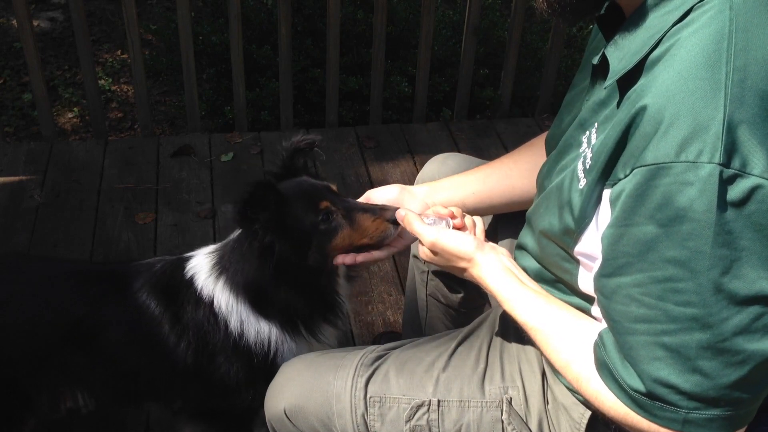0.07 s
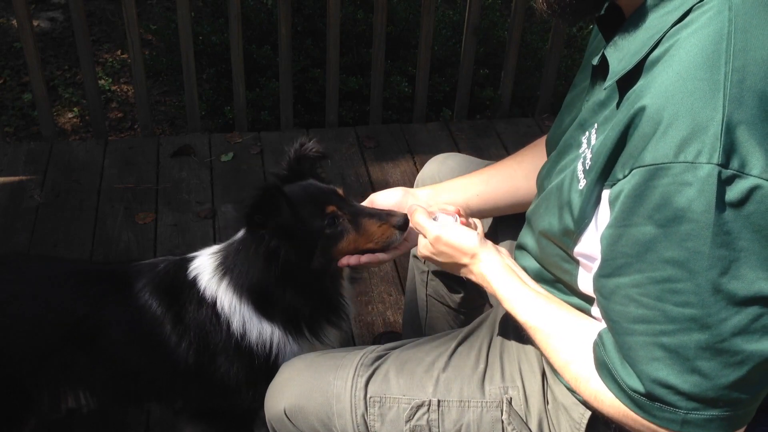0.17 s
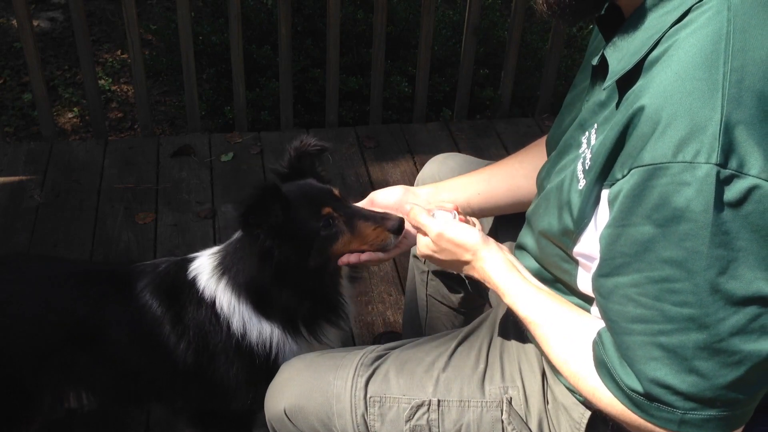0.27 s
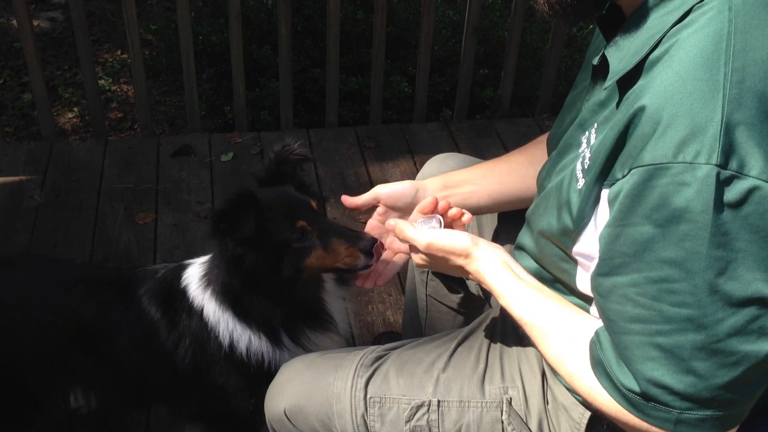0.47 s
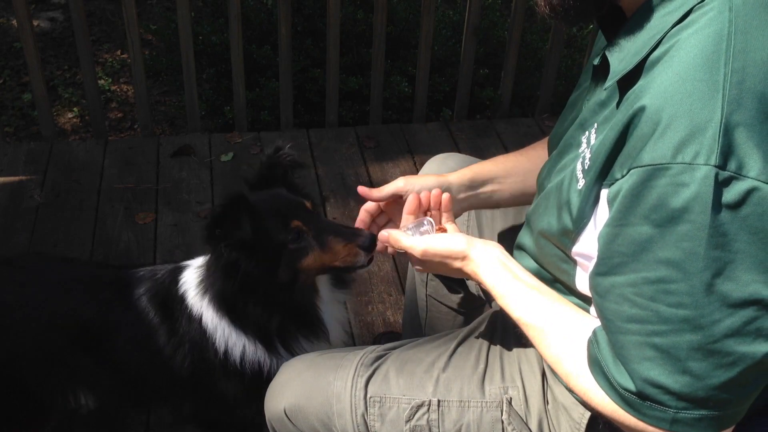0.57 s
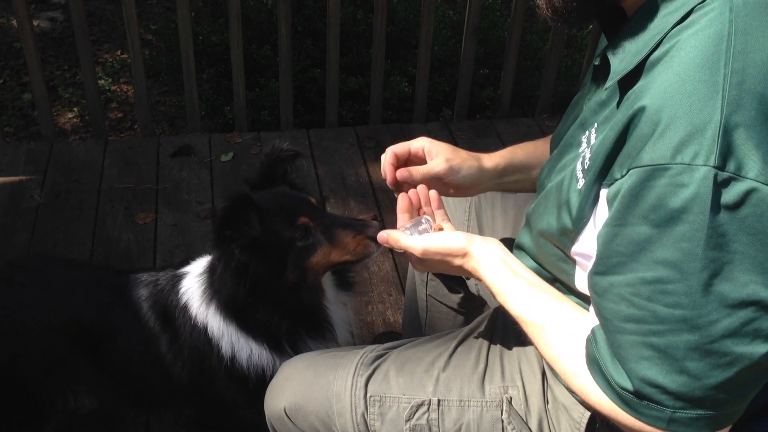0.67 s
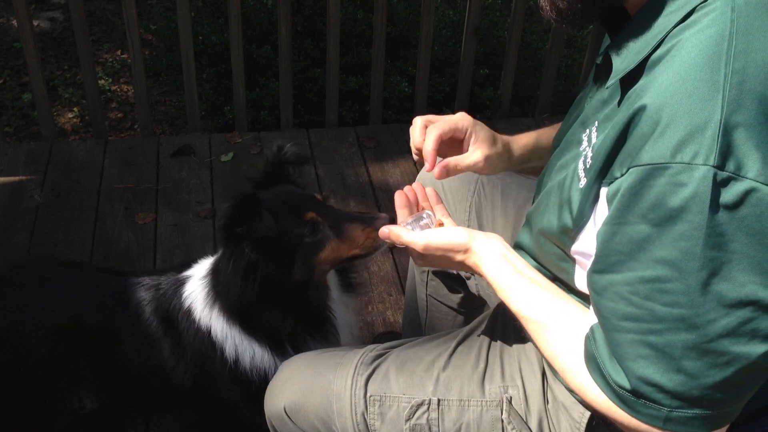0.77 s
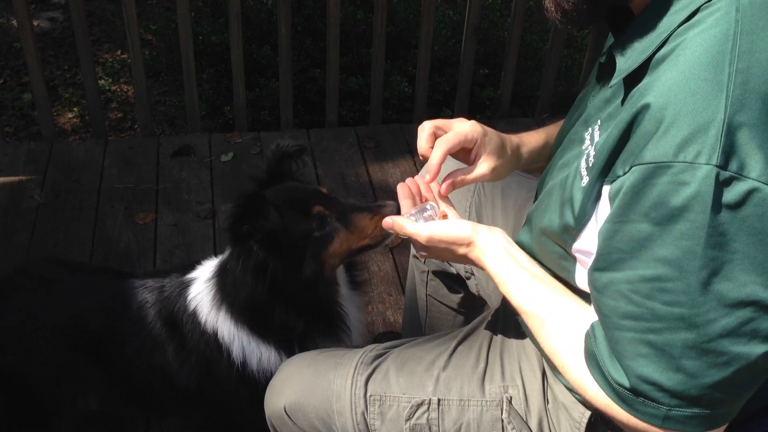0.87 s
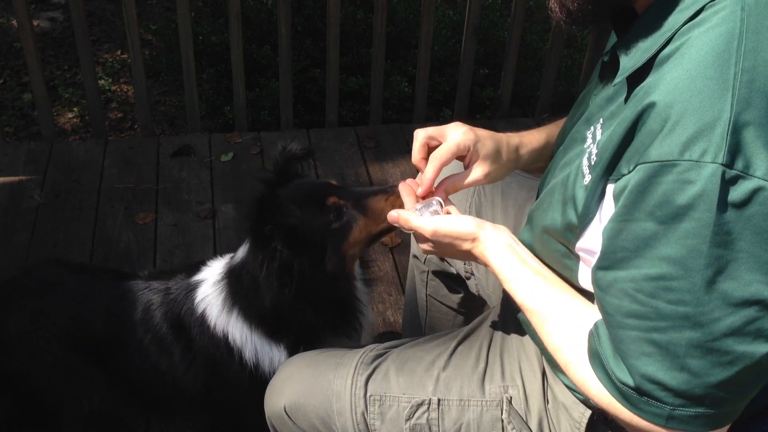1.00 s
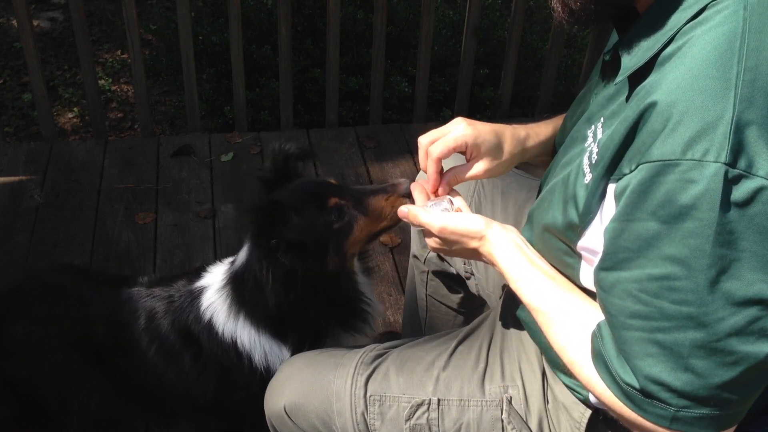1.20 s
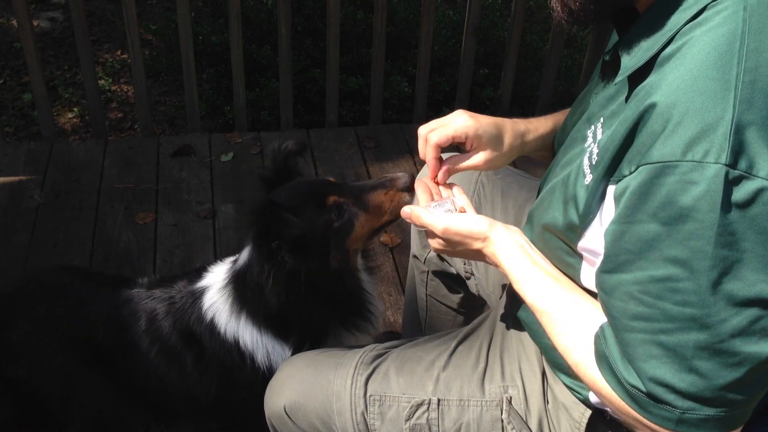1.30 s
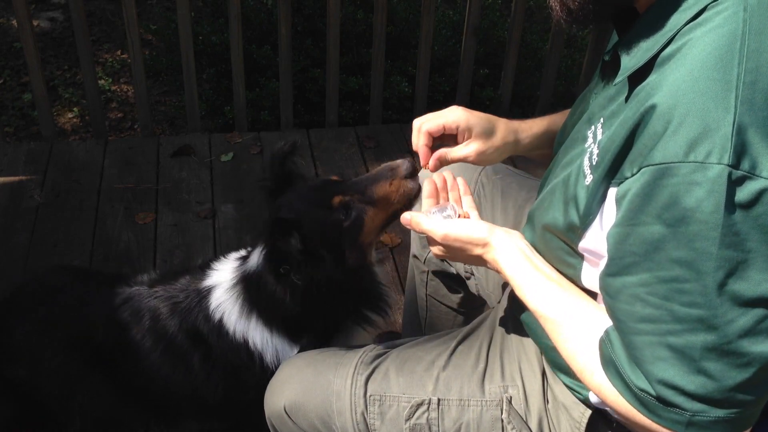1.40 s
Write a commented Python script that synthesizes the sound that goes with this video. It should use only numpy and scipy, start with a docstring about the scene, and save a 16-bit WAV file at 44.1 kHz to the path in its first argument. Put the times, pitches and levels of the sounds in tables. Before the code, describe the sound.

Two quick, crisp clicks come from a small clicker nearby, each with a very brief metallic ring. Then hands move with a soft, dull knock, while birds whistle faintly far from the quiet wooden deck over light hiss.

```python
"""A quiet wooden deck outdoors, where a handheld training clicker is pressed and let go.
Its steel tongue buckles, then springs back, each time with a snap and a brief ring;
hands, boards and railing throw the snap back. A soft knock and thuds follow as the hands move.
Birds whistle far off among the trees, over a faint hiss of air."""
import sys
import numpy as np
from scipy import signal
from scipy.fft import rfft, irfft
from scipy.io import wavfile
from scipy.ndimage import uniform_filter1d

SR = 44100
rng = np.random.default_rng(int(sys.argv[2]) if len(sys.argv) > 2 else 0)


def file_out(sig):
    """Save sig as 16-bit WAV at sys.argv[1]."""
    # one column per channel
    cols = np.atleast_2d(sig).T
    # limit, then scale
    lim = np.clip(cols, -1, 1)
    pcm = np.round(lim * 32767).astype(np.int16)
    wavfile.write(sys.argv[1], SR, pcm)


N = 63945


def clicker(press_s=0.22415, release_s=0.39845, ring_rise_s=0.0006):
    """The steel tongue snaps over with a millisecond crack and rings in its new shape."""
    # Colour of each snap in the plastic case. Each row: frequency in Hz, level in dB.
    press_snap = [(300, -32.5), (950, -25.5), (1350, -15.5), (2350, -17), (3000, 0.5), (4500, 0), (5200, 3),
                  (5950, 3), (6450, 14.5), (7100, 20), (7700, 16.5), (8150, -4), (10100, -9), (11650, 3),
                  (13100, -16), (14500, -19), (16000, -39.5)]
    release_snap = [(300, -35), (950, -23), (1400, -17.5), (2300, -19), (2950, 4.5), (3700, 4), (4100, -4),
                    (4400, 0.5), (5000, 11.5), (5550, 2), (6700, 8.5), (7700, 4.5), (8400, -13.5),
                    (9400, -1.5), (11300, -15), (12500, -6), (13300, -18), (14250, -1), (15400, -35)]
    # The tongue's ring, bent and relaxed. Each row: frequency in Hz, level in dB, T60 in seconds.
    bent_modes = [(2030, -50.5, 0.038), (3300, -45, .035), (3990, -36.5, .032), (4500, -40.5, .025),
                  (6740, -31, .026), (10580, -49.5, .022), (11030, -38.5, .028), (11320, -32, 0.031),
                  (11690, -33, .03), (11970, -36.5, 0.031), (12170, -40, 0.037)]
    relaxed_modes = [(2060, -50.5, 0.046), (3200, -54, 0.029), (3700, -48, 0.022), (4300, -29, 0.035),
                     (4530, -27.5, 0.025), (4705, -42, 0.041), (4980, -37, 0.04), (5500, -38, .022),
                     (6370, -39, .028), (10180, -43, 0.026), (12650, -36, .03), (13800, -48, .03)]
    clicks = [(press_s, press_snap, bent_modes), (release_s, release_snap, relaxed_modes)]
    out = np.zeros(N)
    for start, snap, modes in clicks:
        crack = impulse(snap)
        t = np.arange(len(crack)) / SR
        attack = 1 - np.exp(-(t / ring_rise_s) ** 2)
        add(out, start, crack + attack * ring(modes))
    return out


def deck(dry, scatter_db=-14.5, onset_s=0.0028, hold_s=0.023, drop_db=-5.5, yard_db=-34.5, yard_t60=0.4):
    """Adds close echoes, scatter that thins out beyond the railing, and a faint tail from the yard."""
    # Early reflections off hands, lap and boards. Each row: delay in seconds, level in dB.
    near_echoes = [(.0006, -14.5), (.0017, -20.5), (.0040, -20), (.0076, -27.5)]
    # Tone of the scatter off deck and railing. Each row: frequency in Hz, relative level in dB.
    scatter_colour = [(300, 4.5), (2000, 7), (3500, 1.5), (5000, 1), (6800, -2.5), (7600, -7), (9000, 3),
                      (11500, 4), (15000, -8)]
    # Its decay. Each row: frequency in Hz, T60 in seconds.
    scatter_t60 = [(300, 0.6), (2000, 0.34), (5000, 0.25), (7200, 0.16), (11500, 0.15), (14000, 0.6)]
    size = 24000
    t = np.arange(size) / SR
    # Each band of noise holds briefly, then dies at its own rate.
    hz, frame_s, bands = signal.stft(rng.standard_normal(size), SR, nperseg=256)
    decay_db = 60 * np.maximum(frame_s - hold_s, 0) / curve_at(scatter_t60, hz)[:, None]
    bands *= amp(curve_at(scatter_colour, hz)[:, None] - decay_db)
    scatter = signal.istft(bands, SR, nperseg=256)[1][:size]
    scatter *= np.minimum(t / onset_s, 1) * amp(drop_db * (t > hold_s))
    response = amp(scatter_db) * scatter / np.linalg.norm(scatter)
    response += amp(yard_db) * reverb_tail(yard_t60, size)
    for delay, db in near_echoes:
        add(response, delay, amp([db]))
    return dry + signal.fftconvolve(dry, response)[:N]


def handling(knock_s=0.5416, knock_db=-40):
    """Moving hands make a dull knock, two low thuds and a little rustle."""
    # Body of the knock. Each row: frequency in Hz, relative level in dB, T60 in seconds.
    knock_modes = [(239, -11.5, .045), (400, -7.5, 0.029), (630, -2.5, .018), (836, -6, 0.019),
                   (1140, -20, .012), (3000, -22, .004)]
    # Thuds just after it. Each row: start in seconds, length in seconds, pitch in Hz, level in dB.
    thuds = [(.551, 0.024, 94, -48.5), (0.575, 0.02, 72, -49.5)]
    # Rustles of the hands. Each row: start in seconds, length in seconds, level in dB.
    rustles = [(0.521, 0.06, -62.5), (.59, 0.17, -65.5)]
    # Their dull tone. Each row: frequency in Hz, relative level in dB.
    rustle_colour = [(30, -8), (70, 4.5), (150, 4), (700, 0), (1600, -5.5), (3500, -8.5), (12000, -27)]
    out = np.zeros(N)
    add(out, knock_s, amp(knock_db) * ring(knock_modes))
    for start, length, hz, db in thuds:
        t, swell = arch(length)
        add(out, start, -amp(db) * swell * np.sin(2 * np.pi * hz * t))
    for start, length, db in rustles:
        t, swell = arch(length)
        add(out, start, amp(db) * swell * noise(rustle_colour)[:len(t)])
    return out


def birds(bend_depth=0.0302, waver_depth=0.02006, wet_db=-4, woods_t60=0.65):
    """Distant whistles that glide, bend up mid-note and waver, smeared by the trees."""
    # Each row: start in seconds, length in seconds, first and last pitch in Hz, level in dB.
    notes = [(.005, .045, 2550, 2760, -67), (.043, 0.026, 2764, 2824, -53), (0.077, 0.044, 2900, 2900, -66),
             (0.149, 0.033, 2840, 3160, -66), (0.302, 0.03, 2248, 2415, -60.5),
             (.365, 0.04, 2435, 2430, -64), (0.469, 0.024, 2695, 2876, -58.5),
             (.49, .045, 2960, 2967, -65.5), (0.551, 0.029, 2930, 2980, -68),
             (.605, 0.031, 2860, 3090, -68), (.757, 0.037, 2156, 2130, -61.5),
             (.828, .026, 2315, 2387, -60.5), (.875, .03, 2370, 2375, -70)]
    whistles = np.zeros(N)
    for start, length, first_hz, last_hz, db in notes:
        t, swell = arch(length)
        waver = unit_rms(uniform_filter1d(rng.standard_normal(N), size=200))[:len(t)]
        glide_hz = first_hz + (last_hz - first_hz) * t / length
        hz = glide_hz * (1 + bend_depth * swell + waver_depth * waver)
        add(whistles, start, amp(db) * swell * np.sin(2 * np.pi * np.cumsum(hz) / SR))
    woods = signal.fftconvolve(whistles, reverb_tail(woods_t60, N))[:N]
    return whistles + amp(wet_db) * woods


def air(end_db=-63, fade_db_per_s=-0.14):
    """A faint bed of outdoor wash and hiss, easing very slowly."""
    # Tone of the bed. Each row: frequency in Hz, relative spectral density in dB.
    air_colour = [(15, -52.5), (25, -29.5), (45, -12), (80, -4.5), (115, -8.5), (180, -5), (400, -4),
                  (700, -8.5), (1150, -14), (2500, -13.5), (4400, -13.5), (14800, -18), (16000, -25.5)]
    from_end_s = (np.arange(N) - N) / SR
    return noise(air_colour) * amp(end_db + fade_db_per_s * from_end_s)


def amp(db):
    """Decibels to gain."""
    return 10 ** (np.asarray(db) / 20)


def unit_rms(x):
    """Scales to an RMS of one."""
    return x / np.sqrt(np.mean(x ** 2) + 1e-20)


def curve_at(points, hz):
    """Interpolates a curve on a log-frequency axis."""
    point_hz, values = np.transpose(points)
    return np.interp(np.log(hz + 1), np.log(point_hz + 1), values)


def add(mix, start_s, sound):
    """Mixes a sound in at its start time."""
    part = mix[max(round(start_s * SR), 0):][:len(sound)]
    part += sound[:len(part)]


def noise(colour):
    """Steady noise of the given colour, at an RMS of one."""
    gain = amp(curve_at(colour, np.fft.rfftfreq(N, 1 / SR)))
    return unit_rms(irfft(rfft(rng.standard_normal(N)) * gain, N))


def impulse(colour, size=4096):
    """The tightest click of the given colour: a minimum-phase impulse."""
    hz = abs(np.fft.fftfreq(size, 1 / SR))
    log_gain = np.log(amp(curve_at(colour, hz)))
    spectrum = np.exp(np.conj(signal.hilbert(log_gain)))
    return np.fft.ifft(spectrum).real


def ring(modes, size=4096):
    """Struck modes of alternating polarity, each dying at its own speed."""
    t = np.arange(size) / SR
    return sum((-1) ** k * amp(db - 60 * t / t60) * np.sin(2 * np.pi * hz * t)
               for k, (hz, db, t60) in enumerate(modes))


def arch(length_s):
    """Time axis and half-sine swell for one short sound."""
    t = np.arange(0, length_s, 1 / SR)
    return t, np.sin(np.pi * t / length_s)


def reverb_tail(t60, size):
    """A diffuse tail: decaying white noise of unit energy."""
    tail = rng.standard_normal(size) * amp(-60 * np.arange(size) / SR / t60)
    return tail / np.linalg.norm(tail)


def scene():
    """Clicker and hands up front on the deck, birds and air behind, in mono."""
    return (deck(clicker()) + handling() + birds() + air())[None]


def record(dry):
    """A steep low-pass trims the very top of the treble."""
    lowpass = signal.firwin(255, cutoff=15950, window=("kaiser", 8), fs=SR)
    return signal.oaconvolve(dry, lowpass[None], "same")


dry = scene()
out = record(dry)
file_out(out)
```